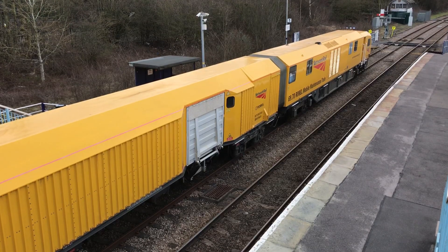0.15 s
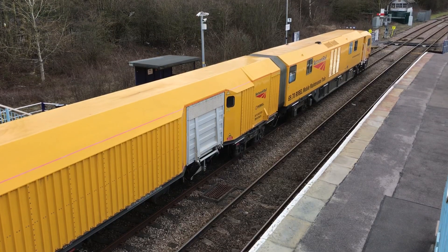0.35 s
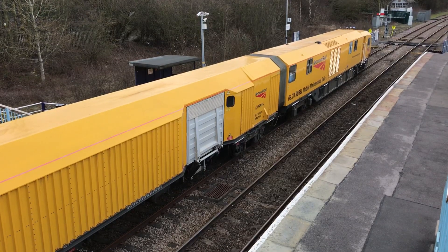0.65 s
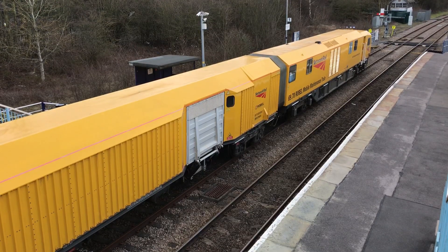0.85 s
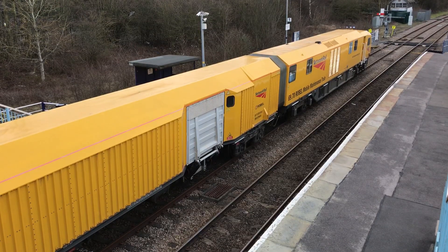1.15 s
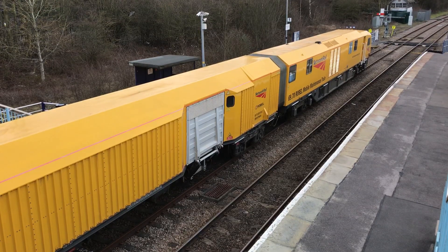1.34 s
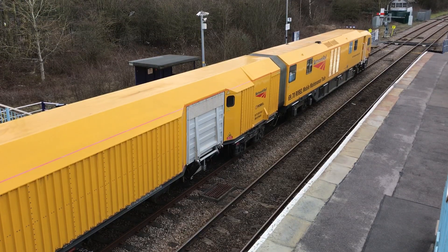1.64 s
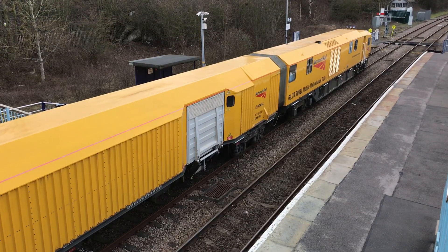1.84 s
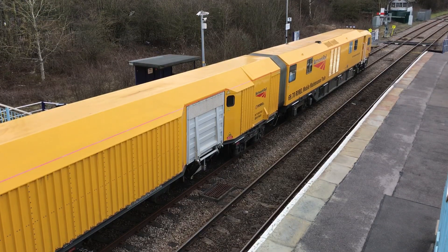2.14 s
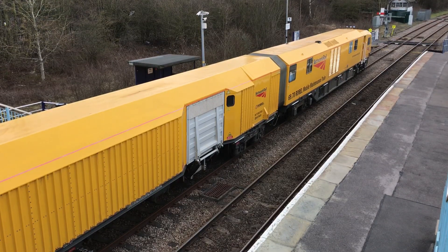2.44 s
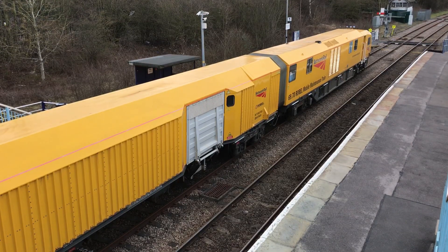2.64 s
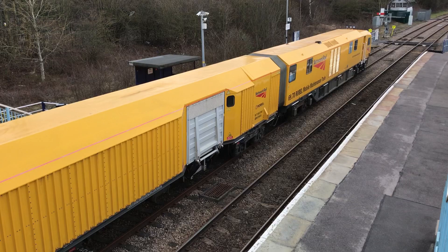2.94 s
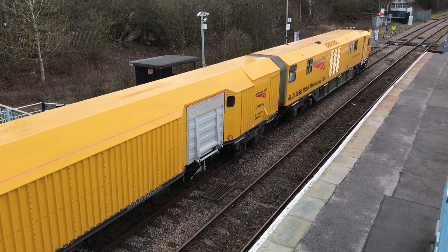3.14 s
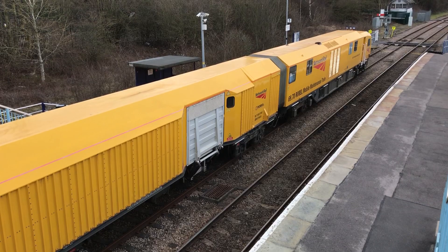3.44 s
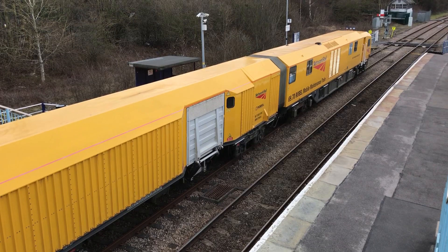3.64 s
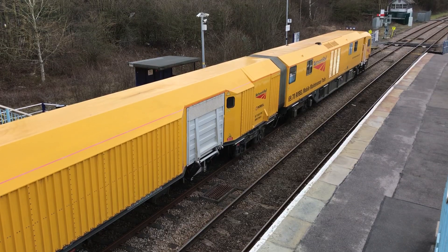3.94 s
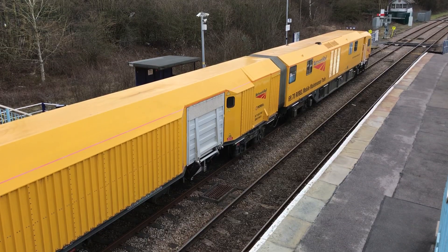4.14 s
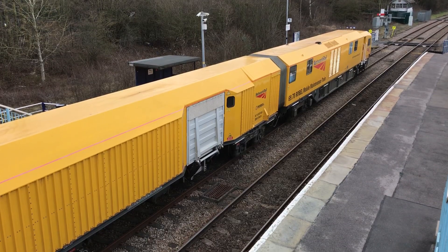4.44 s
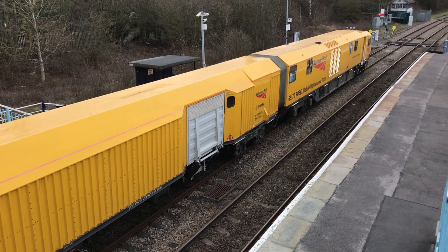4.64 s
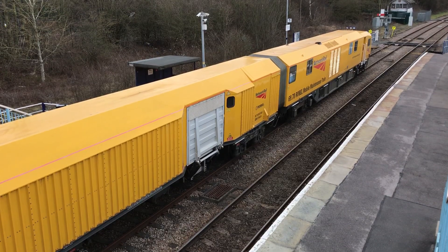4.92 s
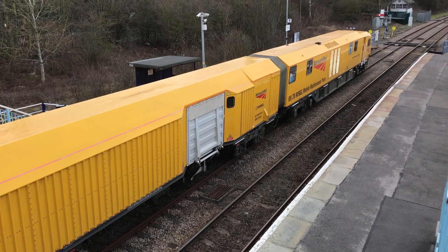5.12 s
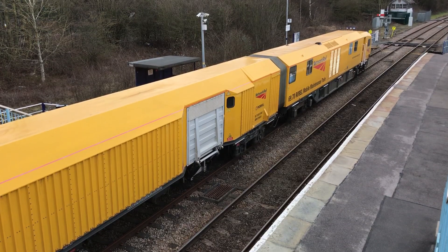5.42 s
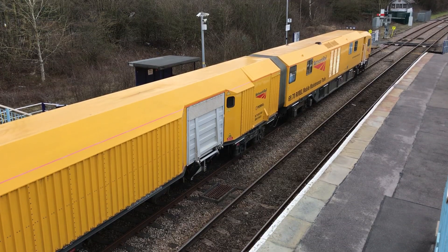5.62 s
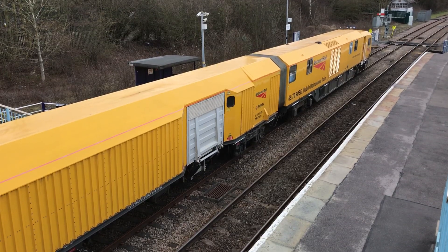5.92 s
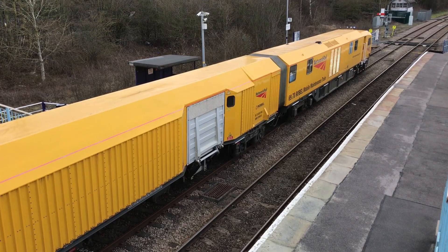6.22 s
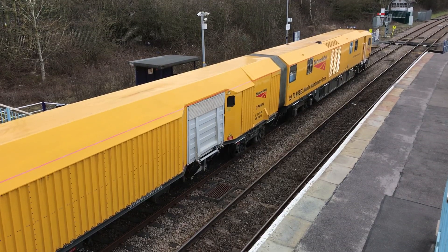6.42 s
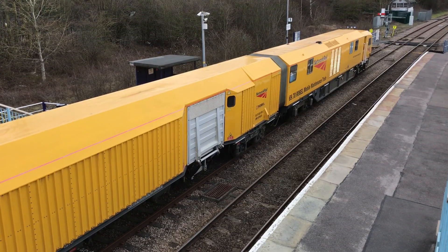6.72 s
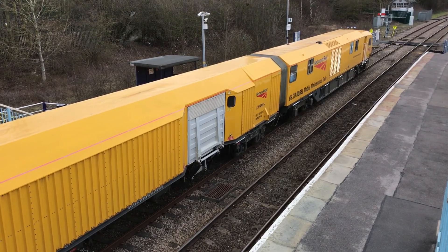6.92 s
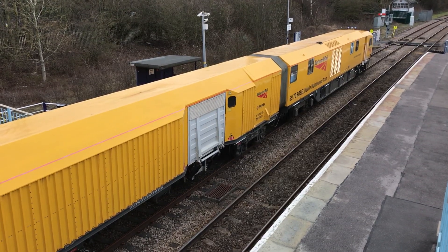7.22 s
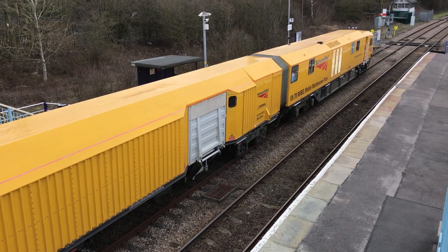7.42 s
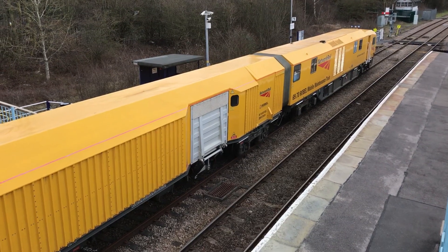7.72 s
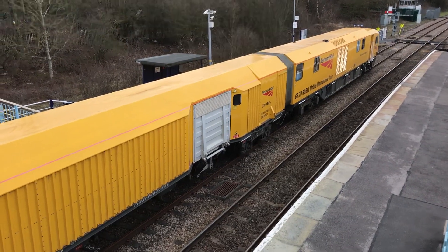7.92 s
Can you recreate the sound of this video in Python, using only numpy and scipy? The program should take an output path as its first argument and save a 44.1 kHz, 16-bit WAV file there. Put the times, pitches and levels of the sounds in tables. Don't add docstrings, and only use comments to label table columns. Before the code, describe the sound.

A diesel rail maintenance train stands idling beside an open-air platform, heard from a footbridge. Its low steady hum carries faint gear whines, a soft fan roar and a light rapid rattle. Wind rumbles gently at first, then stronger gusts buffet the bare microphone with deep thumps and abrupt pops, especially from the middle onward, often louder than the engine.

```python
import sys
import numpy as np
from scipy import signal
from scipy.fft import rfft, irfft, next_fast_len
from scipy.io import wavfile
from scipy.ndimage import uniform_filter1d, map_coordinates

SR = 44100
rng = np.random.default_rng(int(sys.argv[2]) if len(sys.argv) > 2 else 0)


def transcribe(u):
    v = np.clip(np.atleast_2d(u).T, -1, 1)
    q = np.round(v * 32767).astype(np.int16)
    wavfile.write(sys.argv[1], SR, q)


def boost(x):
    u = np.asarray(x, float) / 20
    return 10 ** u


N = 355446

CYCLE_HZ = 7.125
# (time [s], level [dB])
CARRIED = [(0, -48.5), (.4, -47.5), (.75, -49), (1.55, -48), (2.25, -50), (2.75, -47), (3.05, -48),
           (3.28, -50), (3.7, -50), (3.92, -47.5), (4.08, -49.5), (4.6, -51), (4.78, -48), (5.52, -51.5),
           (5.95, -49.5), (6.4, -51), (7.0, -49), (8.06, -50)]


def engine():
    # (multiple of the cycle rate [1], rms level [dB])
    orders = [(8, -25.5), (10, -38), (24, -43), (48, -52), (50, -53), (54, -55), (62, -58), (74, -57),
              (84, -56), (108, -61), (110, -62), (120, -66), (124, -66)]
    # (frequency [Hz], rms level [dB])
    whines = [(201, -52), (334.4, -56), (587.8, -55), (1511.7, -59), (1796.7, -61), (1979.8, -64),
              (2267.7, -68), (2313.5, -62), (2994, -69), (5114, -78)]
    # (multiple of the cycle rate [1], level [dB], beat rate [Hz], first null [s], other engine's share [1])
    beats = [(96, -50.5, .8, .43, .8), (106, -52, .93, .68, .6)]
    lines = [(k * CYCLE_HZ, db) for k, db in orders] + whines
    x = 0
    for hz, db in lines:
        x = x + boost(db) * tone(hz, flutter_db=min(.4 + hz / 250, 3), drift=min(.1 + hz / 900, 2))
    for k, db, beat_hz, null_s, share in beats:
        turns = beat_hz * (np.arange(N) / SR - null_s)
        beat = np.abs(1 - share * np.exp(2j * np.pi * turns))
        x += boost(db) * beat * tone(k * CYCLE_HZ, flutter_db=0.2, drift=0.63)
    carried_db, = curves(CARRIED)
    whistle_db = -75 + 3 * (carried_db - carried_db.mean())
    return x + boost(whistle_db) * tone(7576, flutter_db=3, drift=4)


def roar():
    # (frequency [Hz], density [dB per Hz])
    roar_colour = [(30, -42), (70, -10.5), (170, -4), (270, -9), (440, -15), (770, -14.5), (830, -18),
                   (1100, -19.5), (2000, -19), (4300, -26), (5200, -33), (9500, -36), (13200, -47.5),
                   (15700, -58)]
    # (centre [Hz], half width [Hz], gain [dB])
    housing = [(518, 31, 9), (654, 37, 5.5), (944, 19.5, 5.5), (1540, 175, 4), (1642, 40, -5.5),
               (6040, 280, 1.5), (7130, 210, 2), (10480, 270, -5), (13550, 300, -4), (2560, 78, 2.5),
               (7750, 150, -2), (11200, 480, 1)]
    level_db, = curves(CARRIED)
    level_sway = level_db - level_db.mean()
    treble_db = .3 * level_db + 1.5 * wobble(17)
    treble_sway = treble_db - treble_db.mean()

    hz, t, z = signal.stft(rng.standard_normal(N + 512), SR, nperseg=512)
    patches = uniform_filter1d(rng.standard_normal(z.shape), size=12, axis=0)
    patches = uniform_filter1d(patches, size=20, axis=1)

    frames = np.clip((t * SR).astype(int), 0, N - 1)
    hz = hz[:, None]
    sway = np.clip(hz / 2500, .4, 1) * level_sway[frames]
    sway += np.clip(hz / 4000 - 2, 0, 1) * treble_sway[frames]
    sway += np.clip(hz / 9000, 0, 1.5) * 0.29 * wobble(10)[frames]
    patchy = signal.istft(z * boost(.5 * unit(patches) + sway), nperseg=512)[1][:N]

    def body(f):
        bumps = sum(db / (1 + ((f - centre) / width) ** 2) for centre, width, db in housing)
        return boost(along(roar_colour, f) + bumps)

    return boost(-38.5) * unit(filtered(patchy, body))


def valve():
    # (resonance [Hz], half width [Hz], level [dB], place in the cycle [cycles], sharpness [1])
    rattle = (1854, 52, -54, -0.07, 1.5)
    hz, width, db, place, sharp = rattle
    cycles = CYCLE_HZ * np.arange(N) / SR - place
    swell = np.exp(sharp * np.cos(2 * np.pi * cycles) / 2)
    shake = noise(lambda f: 1 / (1 + ((f - hz) / width) ** 2))
    shake = shake + .9 * tone(1859, flutter_db=1, drift=7)
    return boost(db + .8 * wobble(4)) * unit(swell * shake)


def wind():
    push = filtered(buffeting() + jumps() + flurries(), low_cut)
    push = push / (1 + np.abs(push / .66) ** 5) ** (1 / 5)
    return filtered(push, lambda f: 1 / (1 + (f / 1650) ** 10))


def buffeting():
    # (time [s], level of the large eddies [dB])
    breeze = [(0, -34), (.75, -27.5), (1.62, -33), (2.1, -26.5), (2.87, -30.5), (3.2, -26), (3.55, -19),
              (4.02, -26.5), (4.4, -16), (4.78, -27), (5.32, -21), (5.84, -24.5), (6.25, -25.5), (6.7, -26),
              (7.0, -29), (7.45, -27.5), (7.85, -36.5), (8.06, -23)]
    # (time [s], level [dB], half length [ms])
    rolls = [(1.375, -16, 12), (1.903, -13.5, 12), (2.129, -18, 18), (2.352, -21, 12), (3.372, -18.5, 12),
             (3.481, -16, 13), (3.565, -18.5, 14), (3.659, -14.5, 12), (3.849, -7, 8.6), (4.396, -22, 30),
             (4.517, -12.5, 11), (4.618, -17, 12), (4.956, -13.5, 16), (5.126, -15.5, 11),
             (5.192, -15, 9.9), (5.301, -15, 10), (5.383, -10.5, 9.8), (5.442, -5.5, 9.1),
             (6.037, -9.5, 11), (6.257, -8, 8), (6.323, -8, 15), (6.51, -12.5, 12), (6.648, -20, 17),
             (6.79, -16, 7.6), (7.276, -21, 23), (7.417, -15, 11), (7.464, -16, 27), (7.685, -17.6, 14),
             (7.747, -8, 18), (7.977, -17.6, 12)]
    # (time [s], level [dB], half length [ms])
    puffs = [(1.38, -25, 9.4), (1.894, -23.5, 5.3), (2.128, -29.0, 7), (2.348, -35, 6.7), (2.917, -23, 6.8),
             (3.259, -21, 8.9), (3.575, -39, 20), (3.773, -20, 16), (3.872, -22.5, 15), (4.136, -22, 13),
             (4.347, -19, 6.9), (4.393, -21.2, 6.5), (4.51, -23, 7.6), (5.183, -17.5, 6.6),
             (5.348, -27, 16), (5.408, -21, 4.7), (5.51, -24.3, 5.2), (5.682, -17.5, 7), (6.252, -25, 15),
             (6.338, -21, 16), (6.38, -21.1, 8.1), (6.531, -23.5, 31), (6.667, -23, 9), (6.773, -20, 7.2),
             (7.276, -17, 5.2), (7.397, -20.5, 6.9), (7.508, -25, 7), (7.671, -14, 15.6), (7.75, -24, 10.4),
             (7.975, -10.5, 5.2)]
    # (frequency [Hz], density [dB per Hz])
    large = [(15, -31), (40, 10), (70, 10.5), (120, -11), (180, -15.5), (400, -51)]
    # (frequency [Hz], density [dB per Hz])
    medium = [(60, -38), (110, 4.5), (200, -6.5), (300, -13), (500, -33), (900, -70)]
    large_db, = curves(breeze)
    medium_db = large_db.mean() - 10 + 1.06 * (large_db - large_db.mean())
    shared_lumps, gusty_db = wobble(30), 3.5 * wobble(14)

    def eddies_of(bed_db, singles, colour, lump_db):
        lumps = boost(lump_db * (0.45 * shared_lumps + 0.66 * wobble(45)))
        eddies = noise(lambda f: boost(along(colour, f)))
        bed = boost(bed_db + gusty_db) * evened(unit(lumps * eddies), size=3000)
        passing = np.sqrt(swells(singles)) * boost(-2.0) * evened(eddies, size=600)
        return bed + passing

    return eddies_of(large_db, rolls, large, lump_db=2.5) + eddies_of(medium_db, puffs, medium, lump_db=4)


def jumps():
    # (time [s], size [dB], rise [ms])
    fronts = [(3.779, -9.5, 1), (3.861, -12, .6), (4.137, -13, 0.63), (4.247, -15, 0.55),
              (4.394, -12, 0.36), (4.509, -15, 0.73), (4.516, -6, 0.25), (4.901, -15, 0.53),
              (5.178, -1.5, 0.96), (5.278, -9.5, 0.68), (5.345, -12.5, 0.7), (5.367, -8.5, 0.42),
              (5.406, -15, 0.33), (5.51, -15, 0.41), (5.692, -9, 0.75), (6.303, -16, 0.25),
              (6.342, -10, 0.21), (6.388, -11, .45), (6.503, -12.5, 0.22), (6.529, -10, 0.53),
              (6.662, -12.5, 0.19), (6.769, -11, 0.52), (6.818, -12.5, 0.64), (7.274, -5, 0.93),
              (7.396, -8.5, .74), (7.684, -2, .78), (7.741, -3, 0.25), (7.753, -3.5, 0.1),
              (7.972, -7, 0.64), (7.975, -13, 0.1)]
    x = np.zeros(N + 2000)
    t = np.arange(-600, 600) / SR * 1000
    chance = rng.standard_normal((len(fronts), 4))
    leads = []
    for (s, *_), c in zip(fronts, chance):
        leads.append((s - .013 * boost(5 * c[2]), -20 + 1.5 * c[3], 0.63))
    signs = np.sign(chance[:, :2].T.ravel())
    for (s, db, rise), sign in zip(fronts + leads, signs):
        rise = np.clip(rise, .12, 1.5)
        snap = np.cumsum(np.exp(-(t / rise) ** 2))
        swing = np.exp(-.5 * (t / (1 + 2 * rise)) ** 2)
        x[round(s * SR) - 600:][:len(t)] += sign * boost(db) * (2 * snap / snap[-1] - 1) * swing
    return x[:N]


def flurries():
    # (time [s], level [dB], half length [ms])
    bursts = [(3.54, -31, 5.9), (3.83, -28, 3), (4.392, -28, 5.3), (4.435, -27.5, 5.6), (4.513, -12, 2.6),
              (4.597, -28, 5), (4.9, -27.5, 2), (5.36, -36, 15), (5.415, -20, 5.7), (5.69, -24.5, 8),
              (6.05, -30, 5.5), (6.087, -27, 5.5), (6.34, -23, 3.7), (6.499, -17, 8.2), (6.525, -27, 12),
              (6.66, -26.5, 5.7), (6.77, -24, 4.6), (7.465, -29, 6.7), (7.503, -25, 7.7), (7.745, -11, 6.9),
              (7.973, -27, 1.6)]
    # (frequency [Hz], density [dB per Hz])
    tiny = [(150, 3.5), (300, 1.5), (600, -7.5), (1000, -18), (1500, -24), (2200, -54)]
    eddies = noise(lambda f: boost(along(tiny, f)))
    return np.sqrt(swells(bursts)) * unit(boost(3.0 * wobble(220)) * eddies)


def low_cut(f):
    return (1j * f / (1j * f + 32)) ** 3


def hiss():
    return boost(-72) * noise(lambda f: f / (f + 9000))


def tone(hz, flutter_db, drift):
    phase = 2 * np.pi * (hz * np.arange(N) / SR + rng.random()) + drift * wobble(3)
    return np.sqrt(2) * np.sin(phase) * unit(boost(flutter_db * wobble(2.45)))


def noise(gain):
    return unit(filtered(rng.standard_normal(N), gain))


def filtered(x, response):
    m = next_fast_len(N + SR // 2)
    return irfft(rfft(x, m) * response(np.fft.rfftfreq(m, 1 / SR)), m)[:N]


def wobble(rate):
    return map_coordinates(rng.standard_normal(2000), [np.arange(N) * rate / SR])


def swells(rows):
    ms = np.arange(N * 1000 // SR + 1)
    power = sum(boost(2 * db) * np.exp(-.5 * ((ms - s * 1000) / half) ** 2) for s, db, half in rows)
    return np.interp(np.arange(N) * 1000 / SR, ms, power)


def evened(x, size):
    power = uniform_filter1d(uniform_filter1d(x * x, size), size)
    return x / np.sqrt(np.abs(power) + .05)


def curves(rows):
    s, *cols = np.transpose(rows)
    return [np.interp(np.arange(N) / SR, s, c) for c in cols]


def along(points, hz):
    f, v = np.transpose(points)
    return np.interp(np.log(hz + 1), np.log(f + 1), v)


def unit(x):
    return x / np.sqrt(np.mean(x ** 2) + 1e-20)


def scene():
    train = filtered(engine() + roar() + valve(), low_cut)
    return (train + wind())[None]


def top_cut(x):
    return signal.sosfilt(signal.butter(12, 15730, fs=SR, output="sos"), x)


def record(dry):
    return top_cut(dry + hiss())


dry = scene()
out = record(dry)
transcribe(out)
```